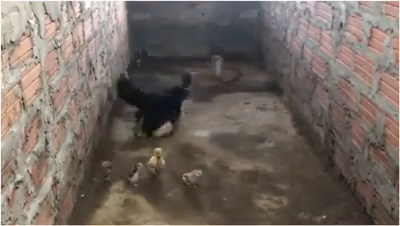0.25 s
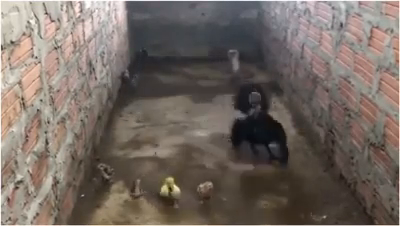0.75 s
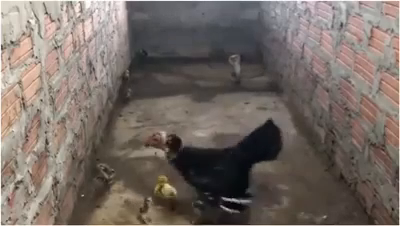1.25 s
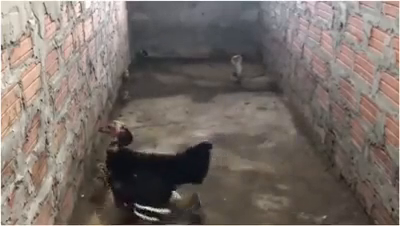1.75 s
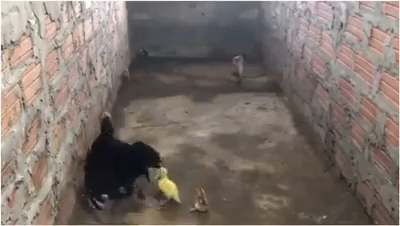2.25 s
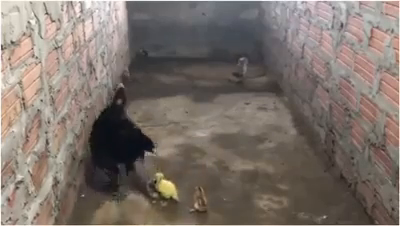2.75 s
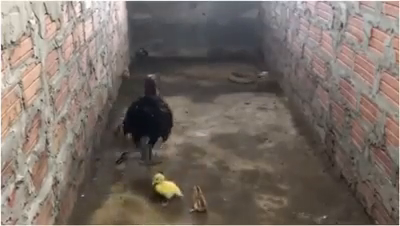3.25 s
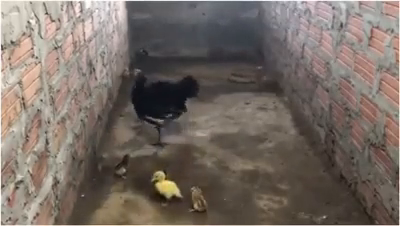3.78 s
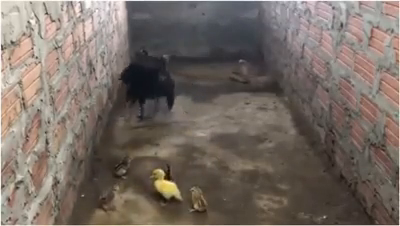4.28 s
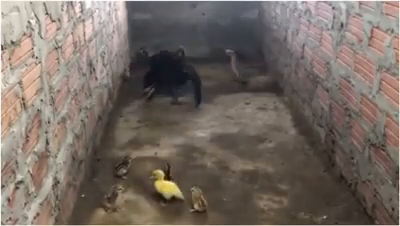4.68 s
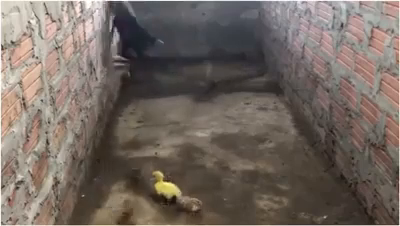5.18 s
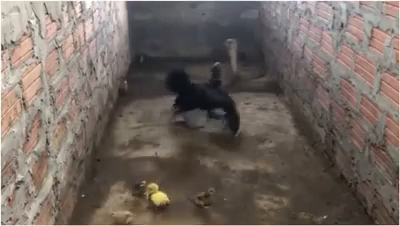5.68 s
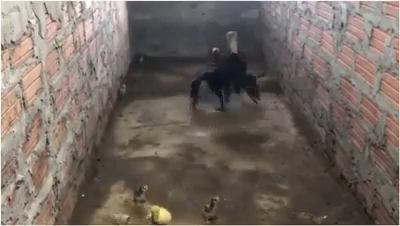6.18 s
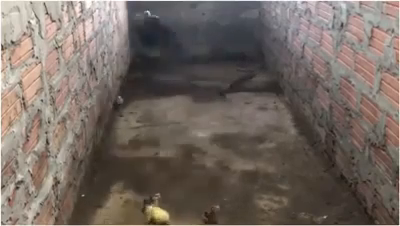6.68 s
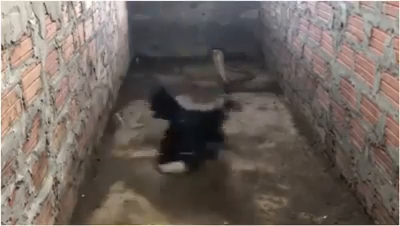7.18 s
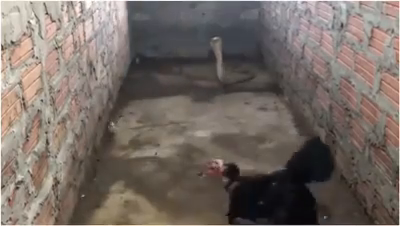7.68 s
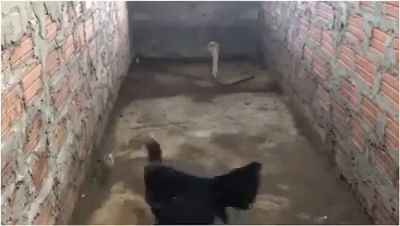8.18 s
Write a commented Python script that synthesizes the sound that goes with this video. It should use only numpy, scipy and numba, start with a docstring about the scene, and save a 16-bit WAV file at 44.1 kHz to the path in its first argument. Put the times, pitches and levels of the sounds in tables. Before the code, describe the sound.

A hen clucks hoarsely in alarm, squawks twice and beats her wings while chicks peep steadily in an echoing brick corridor.

```python
"""Alarmed hen in a brick corridor

A hen clucks hoarsely, squawks twice on a clear pitch and beats her wings in a narrow brick corridor.
Her voice is unsteady pulses and rushing air, rung by windpipe and throat; the wings are thuds and brushed noise.
Several chicks peep as sliding whistles. The walls add a tail of decaying noise bands, over a low hum,
a wavering drone, a thin steady tone and faint hiss. A phone with gain control listens."""
import sys
import numpy as np
from scipy import signal
from scipy.fft import rfft, irfft, next_fast_len
from scipy.io import wavfile
from scipy.ndimage import uniform_filter1d
from numba import njit

SR = 44100
rng = np.random.default_rng(int(sys.argv[2]) if len(sys.argv) > 2 else 0)


def magnitude_from_level(level_db):
    """Linear magnitude for a level in decibels (20 dB per decade)."""
    exponent = np.asarray(level_db, float) / 20
    return 10 ** exponent


def generate_wav(sig):
    """Save sig (samples, or channels by samples) to the path in sys.argv[1] as 16-bit PCM at SR."""
    pcm = np.round(np.clip(np.atleast_2d(sig).T, -1, 1) * 32767).astype(np.int16)
    wavfile.write(sys.argv[1], SR, pcm)


N = 371763


def ring(x, hz, width):
    """Two-pole resonance, gain 1 at the centre."""
    return signal.lfilter(*signal.iirpeak(hz, hz / width, fs=SR), x)


@njit
def sweep(x, hz, width):
    """State-variable band-pass whose centre follows hz."""
    y, band, low = np.empty(len(x)), 0., 0.
    for i in range(len(x)):
        g, k = np.tan(np.pi * hz[i] / SR), width / hz[i]
        v = (band + g * (x[i] - low)) / (1 + g * (g + k))
        band, low, y[i] = 2 * v - band, low + 2 * g * v, k * v
    return y


def colour(x, points):
    """Shape a sound by (Hz, dB) points, joined on a logarithmic frequency scale."""
    hz, db = np.transpose(points)
    size = next_fast_len(len(x))
    bins = np.arange(size // 2 + 1) * SR / size + 1
    gain = magnitude_from_level(np.interp(np.log(bins), np.log(hz), db))
    return irfft(rfft(x, size) * gain, size)[:len(x)]


def unit(x):
    """Scale to rms 1."""
    return x / np.sqrt(np.mean(x ** 2) + 1e-18)


def wobble(size, seconds):
    """Random drift, smoothed twice over the given time, scaled to rms 1 and clipped at 2."""
    span = max(int(seconds * SR), 1)
    drift = unit(uniform_filter1d(uniform_filter1d(rng.standard_normal(size), span), span))
    return np.clip(drift, -2, 2)


def add(track, s, x):
    """Mix x into the track from time s."""
    at = max(int(s * SR), 0)
    track[at:at + len(x)] += x[:N - at]


# Resonances of the upper throat. Each row: centre in Hz, width in Hz, gain in dB.
UPPER_THROAT = [(3383, 555, 14), (4380, 560, 5)]
# Colour of the voice's treble. Each row: frequency in Hz, gain in dB.
VOICE_TREBLE = [(4000, -8.5), (6000, 7), (9500, -0.5), (15000, -10.5)]


def voice(hz, low_db, mouth_db, upper_db, treble_db, jitter, breath, width, half, top_hz, third_db, pipe_at=2):
    """Membrane pulses, unsteady in rate and mixed with rushing air, ring the windpipe and throat."""
    size = len(hz)
    turn = 2 * np.pi * np.cumsum(hz * (1 + jitter * wobble(size, .002))) / SR
    harmonics = (magnitude_from_level(3.5 * wobble(size, .02)) * np.cos(k * turn + .2 * k * k) for k in range(1, 26))
    pulses = unit(sum(harmonics))
    pulses = pulses * (1 + half * np.cos(turn / 2))  # strong-weak pairs
    air = unit(rng.standard_normal(size) * (0.31 + np.cos(turn)))
    roughness = magnitude_from_level(98.0 * min(jitter, .035) * wobble(size, 0.00042))
    source = pulses * roughness + breath * air

    # the windpipe rings near the second harmonic, carries the third and falls away steeply above
    pipe_hz, third_hz = pipe_at * hz, np.minimum(3 * hz, top_hz)
    pipe = sweep(sweep(source, pipe_hz, 1. * width), pipe_hz, 1.5 * width)
    third = sweep(sweep(source, third_hz, 0.6 * width), third_hz, 1.2 * width)
    pipe_cut = signal.butter(3, 0.8 * top_hz, fs=SR, output="sos")
    pipe = signal.sosfilt(pipe_cut, pipe + magnitude_from_level(third_db) * third)

    crop_hz = np.minimum(hz, 590.)  # the crop rings on the fundamental
    low = sweep(sweep(source, crop_hz, .5 * width), crop_hz, 1. * width)
    mouth_hz = 4 * hz  # fourth harmonic
    mouth = sweep(sweep(source, mouth_hz, 330.), mouth_hz, 400.0)
    stretch = 1 + 2 * jitter * rng.standard_normal()  # throat resonances shift a little at random in each call
    upper = 0
    for f, w, db in UPPER_THROAT:
        upper = upper + magnitude_from_level(db) * ring(ring(source, stretch * f, w), stretch * f, 4.1 * w)
    treble = colour(source + breath * air, [(2500, -59.0)] + VOICE_TREBLE)

    parts = [(pipe, 0), (low, low_db), (mouth, mouth_db), (upper, upper_db), (treble, treble_db)]
    return sum(magnitude_from_level(db) * unit(part) for part, db in parts) * magnitude_from_level(1.5 * wobble(size, 0.017))


# Each row: start in seconds, level in dB, nominal length in seconds, pitch in Hz, fundamental in dB,
# third harmonic in dB, rasp (offset of mouth, throat and treble) in dB.
CLUCKS = [(0.0, -20.5, 0.032, 572.5, -8.5, 3, -1), (0.063, -9.5, 0.07, 599, -11, -14.5, 0.5),
          (0.236, -11.5, 0.058, 575, -11, -12, 1), (0.453, -11, 0.0494, 609, -10.5, -0.5, 0),
          (0.689, -15.5, 0.075, 479, -16, -3, -4), (1.339, -33.5, 0.0472, 471, 5, -27, -10),
          (1.996, -29.5, 0.051, 462.5, 0.5, -26, -10), (2.665, -29.5, 0.041, 428.7, -4.5, -6, -23),
          (3.391, -37.5, 0.0371, 400, -8, -6.5, -18.5), (3.704, -13, 0.038, 594, -16, -26.5, -3),
          (4.298, -25.5, 0.0549, 401.3, -13.5, -35, -11), (4.526, -18.5, 0.0528, 419.7, -23, -33, -13),
          (4.713, -11.5, 0.0627, 527, -16, -26.5, -3), (4.878, -8, 0.054, 604.6, -16.5, -16, -1.5),
          (4.994, -5.5, 0.057, 691.5, -16.5, -10, -3), (5.107, -5.5, 0.038, 663.6, -26, -28.5, -5),
          (5.157, -13, 0.025, 517.5, -19, -13, -6), (5.242, -8, 0.0381, 633.4, -16, -37, 0.5),
          (5.404, -12.5, 0.0575, 582, -11, -46, 0.5), (5.673, -17, 0.0759, 534.3, -9.5, -21, -1),
          (5.857, -11.5, 0.0595, 601.5, -10.5, -17, -1), (6.071, -15, 0.0725, 454.6, -21, -17, -2.5),
          (6.254, -13.5, .073, 571.6, -12, -9, 1.5), (6.51, -14, 0.0585, 582, -9, -4.5, 4.5),
          (6.605, -6, 0.0897, 608.6, -32.5, 7.5, -1.5), (6.733, -4, 0.042, 711.4, -31.5, -19, -3.5),
          (6.78, -13, 0.0324, 547, -28.5, -23, 0.5), (6.854, -8.5, 0.055, 639, -33, -41, -0.5),
          (7.04, -9, 0.0438, 618, -12, -39, 3), (7.368, -19.5, 0.06, 468, -10.5, -5, -0.5),
          (7.435, -23.5, 0.0333, 540, -20.5, -23, -1), (7.588, -19.5, 0.055, 448.5, -10.5, 3, -0.5),
          (7.788, -13, 0.0432, 568.4, -17, -51, -1.5), (8.377, -29, 0.083, 407.3, -8.5, -28, -14)]


def hen_clucks():
    """Short hoarse calls that swell on an arching pitch; a shut beak favours the fundamental."""
    rise, fall = 0.28, 0.54  # shares of the length
    onset_s, step_db = 0.008, -16.5  # fade-in; level at which the voice breaks in
    treble_db, throat_db, mouth_db = -13.5, -7.5, -14.5  # before the rasp is added
    puff_ahead_s, puff_db = .04, -18.5
    out = np.zeros(N)
    for s, db, length, hz, low_db, third_db, rasp_db in CLUCKS:
        u = np.linspace(-.22, 1.5, int(1.72 * length * SR))  # time in lengths
        # with the beak shut the fundamental is strong, the tone broad and the start abrupt
        shut = np.clip((low_db + 10.5) / 5, 0, 1)
        peak = 0.39 - 0.25 * shut
        swell = np.exp(-((u - peak) / np.where(u < peak, rise - 0.056 * shut, fall)) ** 2)
        swell = np.where(u < peak, np.maximum(swell, magnitude_from_level(step_db)), swell)
        swell = swell * np.clip((u - u[0]) * length / onset_s, 0, 1)
        arch = 1.05 - np.where(u < .35, .7, .25) * (u - .35) ** 2
        pitch = hz * arch * (1 + .055 * wobble(len(u), .007))
        # the low part sounds first, while the beak is still opening
        lead_db = 20.5 * np.clip(peak - u - .15, 0, .7)
        cluck = voice(
            pitch, low_db + (1 - shut) * lead_db, mouth_db + rasp_db, throat_db + rasp_db, treble_db + rasp_db,
            jitter=0.0491 + 0.04 * shut, breath=.42 + .5 * shut, width=440 + 260 * shut,
            half=.4 + .6 * shut, top_hz=1750,
            third_db=third_db - 19 * (u - peak),  # fades as the throat closes
            pipe_at=2.416 - 0.72 * np.clip(u, 0, 1))  # sinks as the neck stretches
        skip = max(int((-u[0] * length - s) * SR), 0)  # whatever falls before time zero
        add(out, s + u[0] * length, magnitude_from_level(db) * (swell * cluck)[skip:])
        if shut == 1:  # a shut beak lets out a short soft puff before the cluck
            short_swell = swell[::3]
            add(out, s - puff_ahead_s, magnitude_from_level(db + puff_db) * short_swell * cluck[:len(short_swell)])
    return out


# Narrow band of low hum. Each row: centre in Hz, width in Hz, level in dB.
HUM = [(89.5, 48, -56.5)]
# Colour of the hiss. Each row: frequency in Hz, gain in dB.
AIR = [(30, -30), (62, 0), (150, -1), (350, -8.5), (1400, -18.5), (2100, -23), (3200, -10.5), (6000, -18.5),
       (15000, -36)]
# Drone loudness over time. Each row: time in seconds, level in dB.
DRONE = [(0, -49.5), (2.8, -52), (3.7, -56.5), (6.2, -55.5), (7.6, -52), (8.5, -45.5)]


def background():
    """A wavering sine drone, a hum of ringing noise and a thin steady-pitched tone over a faint hiss."""
    drone_hz, tone_hz, tone_db, air_db = 44, 247.3, -53, -51.5
    t = np.arange(N) / SR
    turn = 2 * np.pi * np.cumsum(drone_hz * (1 + 0.048 * wobble(N, 0.081))) / SR
    drone_db = np.interp(t, *np.transpose(DRONE)) + 1.6 * wobble(N, 0.061)
    drone = magnitude_from_level(drone_db) * np.sin(turn)
    hum = sum(magnitude_from_level(db) * unit(ring(ring(rng.standard_normal(N), f, w), f, w)) for f, w, db in HUM)
    tone = magnitude_from_level(tone_db + 2.5 * wobble(N, 0.0079)) * np.sin(2 * np.pi * tone_hz * t)
    hiss = magnitude_from_level(air_db) * unit(colour(rng.standard_normal(N), AIR))
    return drone + hum + tone + hiss


# Ring time of the brick walls. Each row: frequency in Hz, time to fall by 60 dB in seconds.
CORRIDOR = [(500, 0.44), (1200, 0.42), (2500, 0.27), (5000, 0.21), (12000, 0.2486)]


def corridor(x):
    """Echo tail of brick walls: patchy noise whose bands die at their own pace."""
    t = np.arange(int(SR * .8)) / SR
    hz, t60 = np.transpose(CORRIDOR)
    tail = 0
    for f in 90 * 2 ** np.arange(0, 7.6, .5):  # half-octave bands
        fade = magnitude_from_level(-60 * t / np.interp(np.log(f), np.log(hz), t60))
        tail = tail + ring(rng.standard_normal(len(t)), f, f / 4.2) * fade
    build_up = np.clip(t / 0.0021, 0, 1)
    tail = tail * build_up * magnitude_from_level(3.5 * wobble(len(t), 0.0032))
    return signal.fftconvolve(x, tail / np.sqrt(np.sum(tail ** 2)))[:N]


# Colour the beak gives each partial. Each row: frequency in Hz, gain in dB.
BEAK = [(2200, 23.5), (2800, 7), (3400, 9), (4200, 6.5), (5000, 4.5), (5800, 6), (9000, -9.5), (11000, 0),
        (13500, -8)]


def peep(s, db, top_hz, rise, fall):
    """A whistle that climbs to a top, slides far down and fades while still sinking."""
    t = np.arange(-rise, 1.3 * fall, 1 / SR)
    v = np.clip(t / fall, 0, 1)  # share of the slide
    high = max(top_hz - 5000, 0)  # higher peeps drop more sharply before the knee and end higher
    slide = np.sin(1.3 * v ** 1.9) / np.sin(1.3)  # the power delays the drop
    slide = slide + .9 * np.clip(t / fall - 1, 0, 1)
    # a rounded shoulder, a steep drop, then a knee
    slide = slide - .04 * np.sin(2 * np.pi * v) + .00013 * high * np.sin(np.pi * v ** 1.2) ** 4
    climb = 1 - 3.2 * rise * np.clip(-t / rise, 0, 1) ** 3  # longer rises start lower
    drop_hz = top_hz - 2850 - .3 * high
    hz = top_hz * climb - drop_hz * slide
    hz = hz * (1 + 0.011 * wobble(len(t), 0.0017) + 0.044 * v * wobble(len(t), 0.0047))
    turn = 2 * np.pi * np.cumsum(hz) / SR
    fade_in = np.clip((t + rise) / 0.027, 0, 1)
    fade_out = np.clip((1.197 * fall - t) / (0.75 * fall), 0, 1)
    # louder towards the knee
    gain = magnitude_from_level(db + 8.5 * (2 * v - 1) + 5.55 * wobble(len(t), 0.0035))
    # overtones are strongest at mid slide
    over_db = -14 - 11 * np.abs(2 * v - 1) + 6 * wobble(len(t), .0006)
    whistle = 0
    for k in range(1, 4):
        partial_db = np.interp(k * hz, *np.transpose(BEAK)) + (k > 1) * over_db
        whistle = whistle + magnitude_from_level(partial_db) * np.sin(k * turn)
    return s - rise, gain * fade_in * fade_out * whistle


# Each row: time in seconds where the pitch tips over, level in dB, top in Hz, rise in seconds, fall in seconds.
PEEPS = [(0.58, -42, 5270, 0.023, 0.097), (0.78, -47, 5110, 0.0097, 0.044),
         (0.833, -38.5, 5700, 0.029, 0.058), (0.978, -44.5, 5070, 0.018, 0.044),
         (1.01, -44, 5440, 0.019, 0.058), (1.179, -47.5, 5650, 0.047, 0.073),
         (1.316, -37.5, 5100, 0.021, 0.041), (1.515, -43, 5490, 0.06, 0.052),
         (1.564, -47.5, 5400, 0.0093, 0.051), (1.661, -48.5, 4670, 0.01, 0.069),
         (1.778, -41, 5620, 0.018, 0.053), (1.825, -46.5, 5640, 0.033, 0.079),
         (1.853, -45, 4440, 0.012, 0.03), (1.951, -42.5, 4810, 0.032, 0.062),
         (2.157, -45, 5716, 0.0537, 0.073), (2.244, -42, 4930, 0.034, 0.066),
         (2.44, -46.5, 5720, 0.032, 0.092), (2.625, -44.5, 4730, 0.051, 0.057),
         (2.746, -45.5, 5090, 0.027, 0.045), (2.76, -42.5, 5940, 0.029, 0.077),
         (3.0, -47, 4690, 0.042, 0.075), (3.128, -43, 5680, 0.067, 0.053), (3.317, -42, 4754, 0.036, 0.084),
         (3.776, -38.5, 6140, 0.016, 0.066), (3.862, -43, 4670, 0.0055, 0.07),
         (3.924, -47, 5020, 0.036, 0.048), (4.612, -49.5, 5150, 0.02, 0.034),
         (4.087, -38, 5910, 0.05, 0.077), (4.408, -36, 6260, 0.036, 0.092),
         (4.773, -38, 5950, 0.014, 0.079), (5.348, -41, 5580, 0.017, 0.042),
         (5.592, -45.5, 5390, 0.011, 0.047), (5.787, -42.5, 4700, 0.017, 0.056),
         (5.814, -45, 5680, 0.058, 0.076), (6.046, -42, 5620, 0.025, 0.041),
         (6.13, -42, 4510, 0.0075, 0.041), (6.162, -42, 5700, 0.0398, 0.053),
         (6.355, -43, 5160, 0.02, 0.052), (6.434, -42, 4820, 0.0062, 0.066),
         (6.438, -44, 5840, 0.055, 0.074), (7.109, -48, 4300, 0.0074, 0.037),
         (7.253, -40, 5560, 0.0063, 0.048), (7.463, -41.5, 4530, 0.0845, 0.047),
         (7.511, -47, 4110, 0.011, 0.032), (7.868, -40, 5250, 0.0097, 0.022),
         (7.888, -45.5, 5030, 0.0048, 0.0466), (8.018, -43.5, 3860, 0.0085, 0.082),
         (8.039, -42, 5600, 0.052, 0.094), (8.126, -42.5, 5380, 0.024, 0.044),
         (8.18, -42, 5450, 0.0065, 0.043), (8.305, -40.5, 5270, 0.012, 0.053),
         (8.398, -38.5, 5480, 0.04, 0.069)]
# Nearest walls. Each row: extra delay in seconds, level in dB.
WALL_ECHOES = [(.009, -6), (.019, -12)]


def chicks(count=45):
    """The clear peeps, and those of chicks further off that come at random and reach us only by the walls."""
    near, far = np.zeros((2, N))
    for row in PEEPS:
        s, whistle = peep(*row)
        for late, db in [(0.0028, 0)] + WALL_ECHOES:
            add(near, s + late, magnitude_from_level(db) * whistle)
    when, loud, high, long = rng.random((count, 4)).T
    rows = [when * N / SR, -54 + 8 * loud, 3900 + 1600 * high, 0.012 + .02 * long, 0.04 + 0.051 * long]
    for row in np.transpose(rows):
        add(far, *peep(*row))
    return near, far


# Each row: start in seconds, level in dB before the thud's envelope.
WINGBEATS = [(5.051, -18.5), (5.11, -21.5), (5.186, -25), (6.578, -22), (6.671, -23), (6.793, -20),
             (6.859, -25.5)]
# Brushes of feathers. Each row: middle in seconds, level in dB, half length in seconds.
RUSTLES = [(1.852, -40, 0.033), (5.087, -28.5, 0.111), (6.735, -32, 0.21)]
# Colour of the brushing. Each row: frequency in Hz, gain in dB.
FEATHERS = [(400, 2), (2500, 11), (6000, 9.5), (15000, -2.5)]


def wings():
    """Low thuds of pushed, turbulent air and the brush of feathers."""
    thud_hz, puff_hz, puff_db = 97, 197, -2
    out, t = np.zeros(N), np.arange(N) / SR
    u = t[:SR // 5]
    envelope = u / 0.04 * np.exp(1 - u / 0.013)
    for s, db in WINGBEATS:
        puff = magnitude_from_level(puff_db) * unit(ring(rng.standard_normal(len(u)), puff_hz, 132))
        thud = np.sin(2 * np.pi * thud_hz * u)
        add(out, s, magnitude_from_level(db) * (thud + puff) * envelope)
    brush = unit(colour(rng.standard_normal(N), FEATHERS)) * magnitude_from_level(3 * wobble(N, .008))
    strokes = sum(magnitude_from_level(db) * np.exp(-((t - s) / half) ** 2) for s, db, half in RUSTLES)
    return out + brush * strokes


# One list per squawk. Each row: time in seconds, pitch in Hz, level in dB, mouth in dB, upper throat in dB.
SQUAWKS = [
    [(3.452, 552, -19, -3, -13), (3.49, 562, -10.5, -4, -13), (3.53, 529, -22, 7, -3),
     (3.58, 546, -17, -4.5, -6.5), (3.64, 578.6, -12.5, -12, -13.5), (3.685, 580, -15.5, -11.5, -6.5),
     (3.715, 583.5, -9.5, 1.5, -12)],
    [(7.667, 533.7, -13, -18, -9.5), (7.7, 566, -16, 0.5, 2), (7.735, 554, -13.5, -6, -2),
     (7.77, 595, -11, -9, -7.5), (7.81, 560.5, -28.5, -5, 15)],
]
# Third harmonic of each squawk, in dB.
SQUAWK_THIRD_DB = (-7, 0)


def hen_squawks():
    """Two long clear calls that start breathy and settle, with little jitter."""
    catch_s = 0.023  # time the breath takes to settle
    out = np.zeros(N)
    for rows, third_db in zip(SQUAWKS, SQUAWK_THIRD_DB):
        s, *columns = np.transpose(rows)
        t = np.arange(s[0], s[-1], 1 / SR)
        hz, db, mouth_db, upper_db = (np.interp(t, s, c) for c in columns)
        edge = np.clip(np.minimum(t - s[0], (s[-1] - t) / 3) / 0.01, 0, 1)
        breath = 0.032 + 0.71 * np.exp(-(t - s[0]) / catch_s)
        treble_db = -5 + 0.76 * upper_db  # the treble follows the upper throat
        squawk = voice(hz, -15.5, mouth_db, upper_db, treble_db, jitter=0.0066, breath=breath,
                       width=546, half=0, top_hz=1900, third_db=third_db)
        add(out, s[0], magnitude_from_level(db) * edge * squawk)
    return out


def scene():
    """Direct sound of each bird plus its share of the corridor, over the background."""
    clucks, squawks = hen_clucks(), hen_squawks()
    young, far = chicks()
    flaps = wings()
    to_walls = magnitude_from_level(-7) * clucks + magnitude_from_level(-7.5) * squawks + magnitude_from_level(-7.5) * young + far + magnitude_from_level(-7) * flaps
    return (clucks + squawks + young + flaps + corridor(to_walls) + background())[None]


def band_limit(x):
    """A steep low-pass at the top of the band."""
    return signal.sosfilt(signal.butter(12, 15640, fs=SR, output="sos"), x)


def record(dry):
    """A steep low-pass leaves nothing above about 15 kHz; gain control ducks loud calls; peaks are rounded."""
    dry = signal.sosfilt(signal.ellip(8, .2, 60, 15200, fs=SR, output="sos"), dry)
    keep = np.exp(-1 / (.08 * SR))  # loudness is averaged over 0.08 s
    loudness = np.sqrt(signal.lfilter([1 - keep], [1, -keep], dry ** 2))
    held = dry * (1 + loudness / 0.83) ** -.4
    rounded = held / (1 + held ** 4) ** .25
    return band_limit(rounded)


dry = scene()
out = record(dry)
generate_wav(out)
```